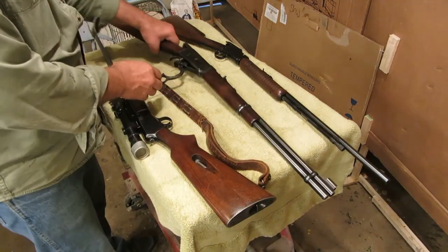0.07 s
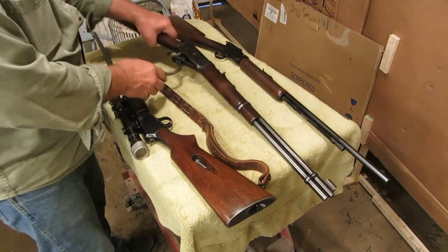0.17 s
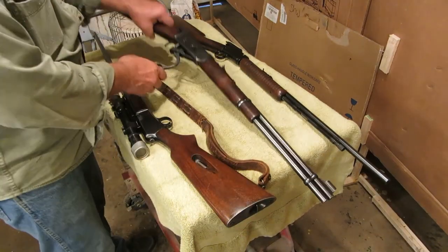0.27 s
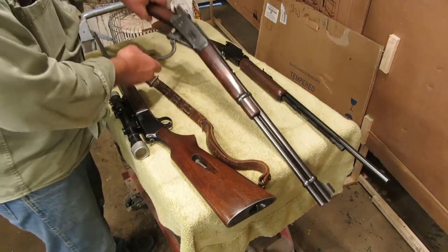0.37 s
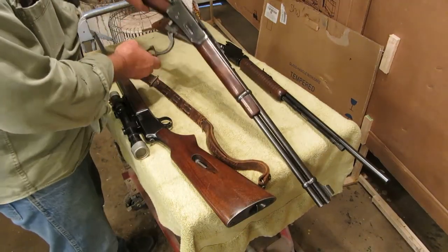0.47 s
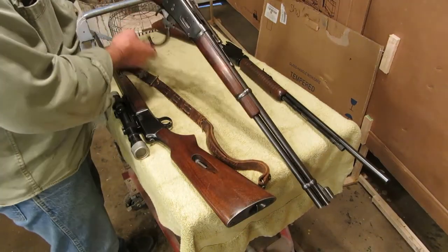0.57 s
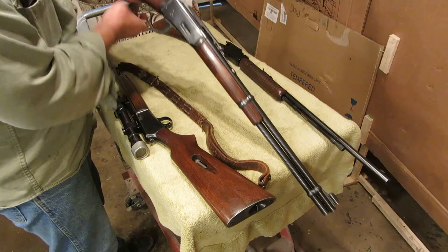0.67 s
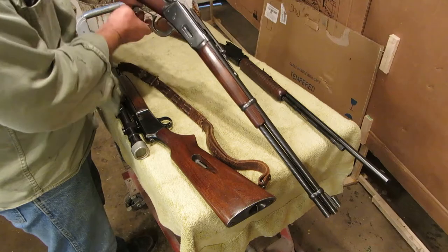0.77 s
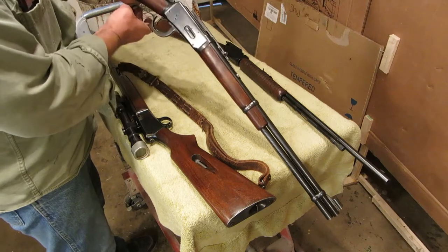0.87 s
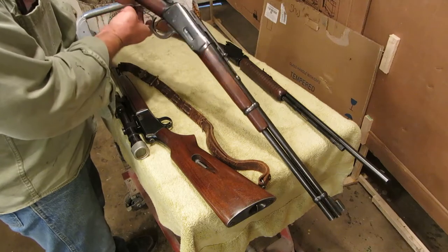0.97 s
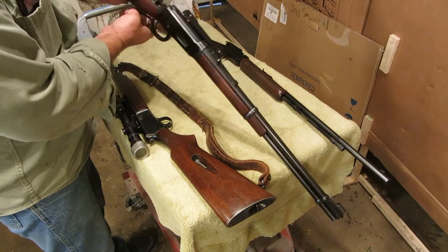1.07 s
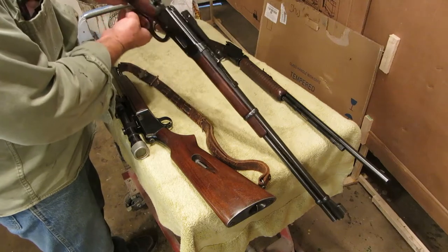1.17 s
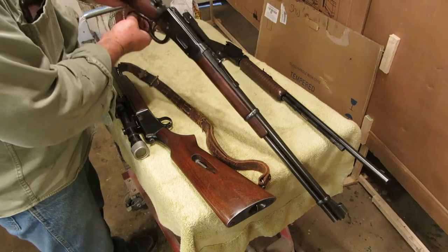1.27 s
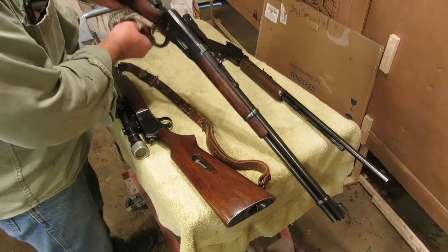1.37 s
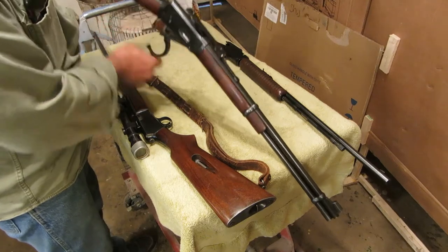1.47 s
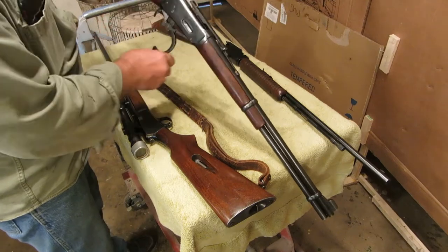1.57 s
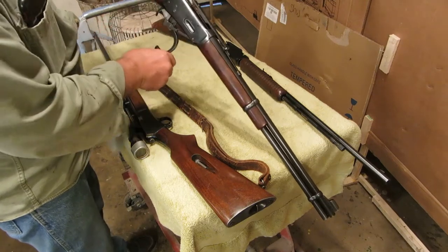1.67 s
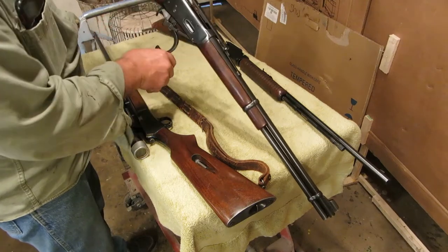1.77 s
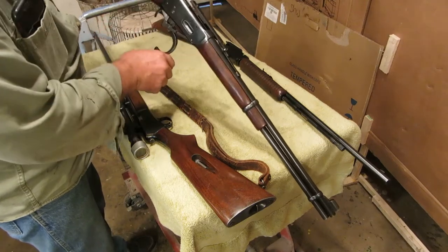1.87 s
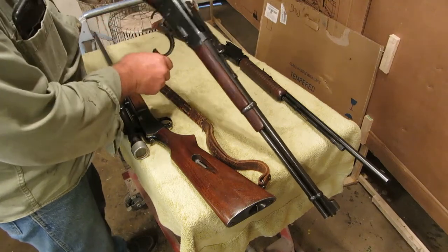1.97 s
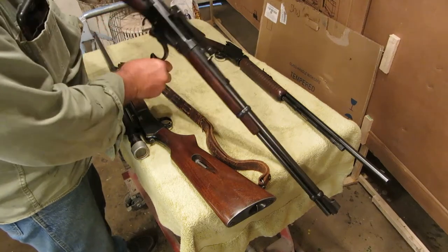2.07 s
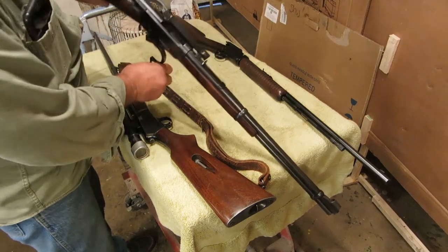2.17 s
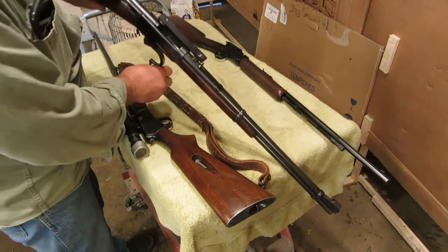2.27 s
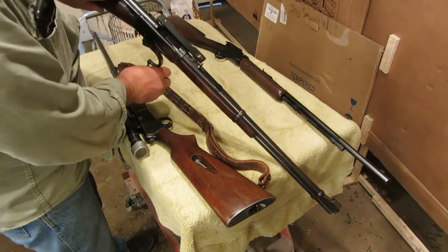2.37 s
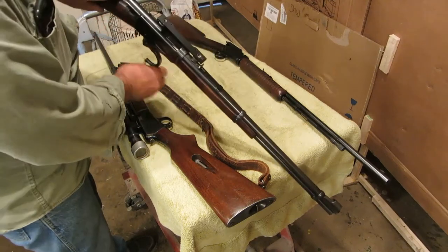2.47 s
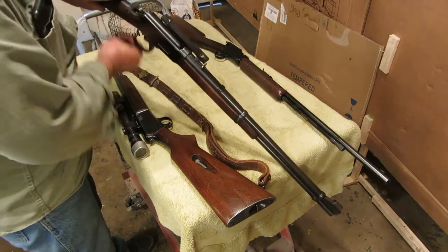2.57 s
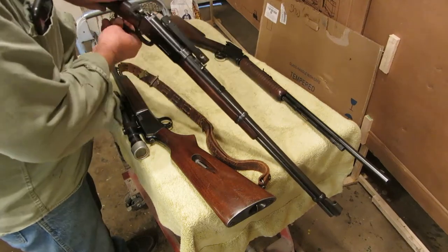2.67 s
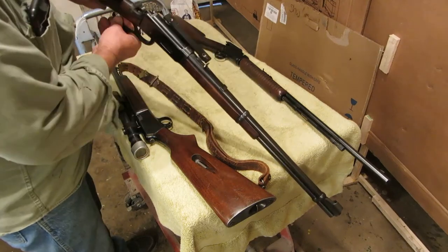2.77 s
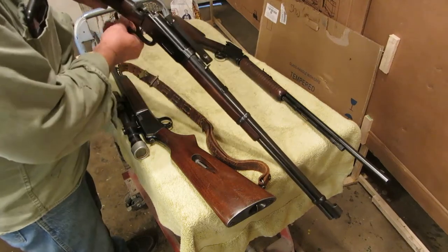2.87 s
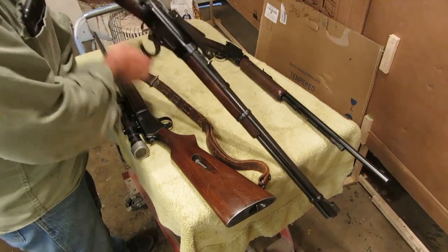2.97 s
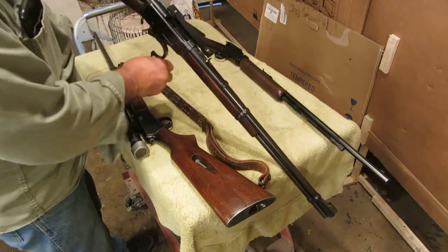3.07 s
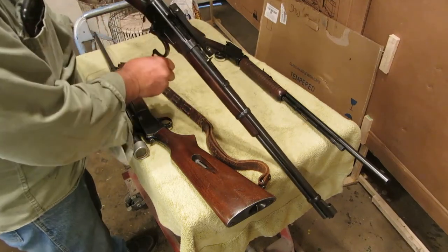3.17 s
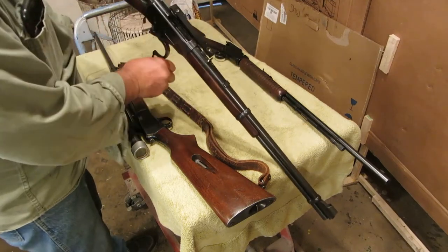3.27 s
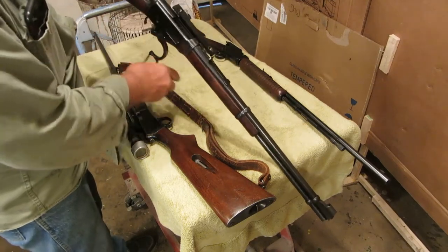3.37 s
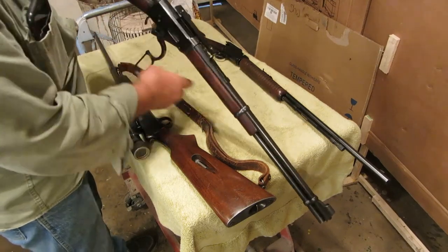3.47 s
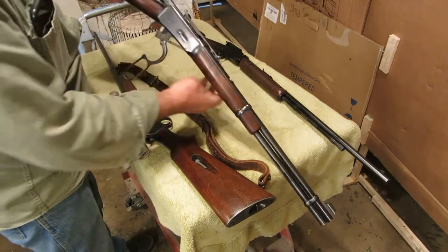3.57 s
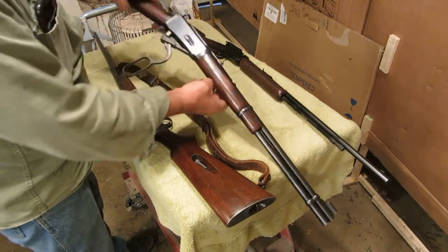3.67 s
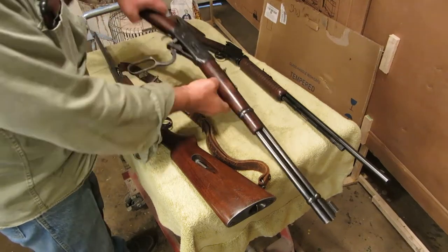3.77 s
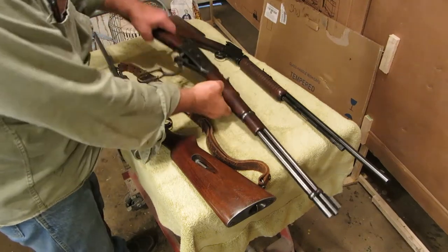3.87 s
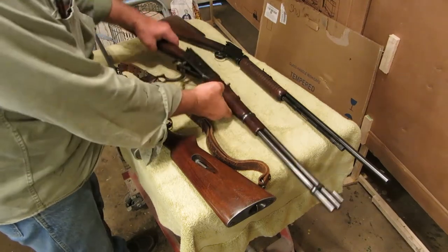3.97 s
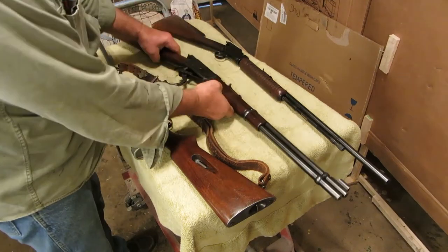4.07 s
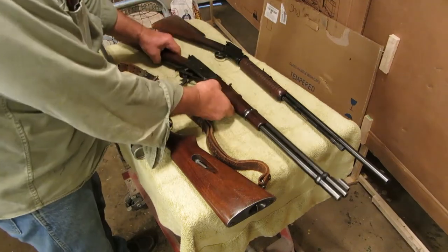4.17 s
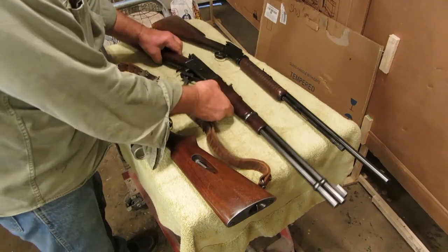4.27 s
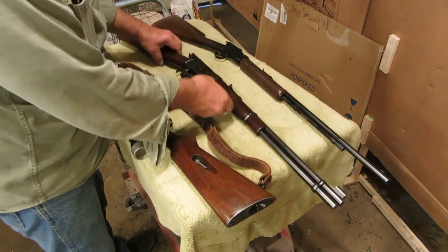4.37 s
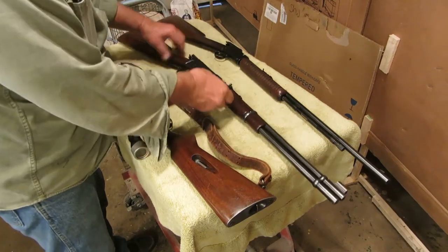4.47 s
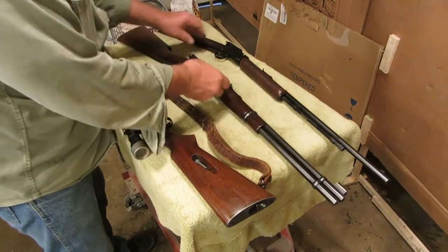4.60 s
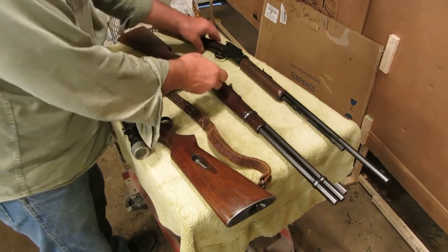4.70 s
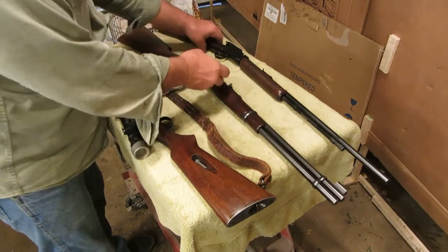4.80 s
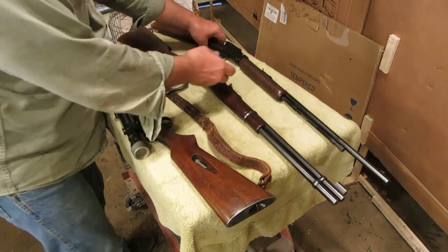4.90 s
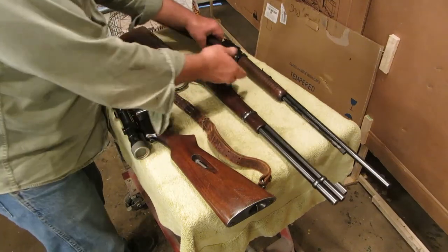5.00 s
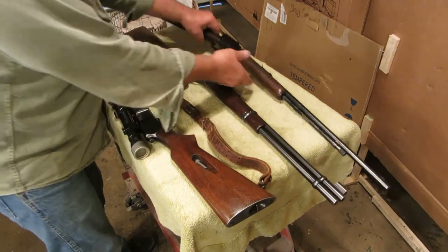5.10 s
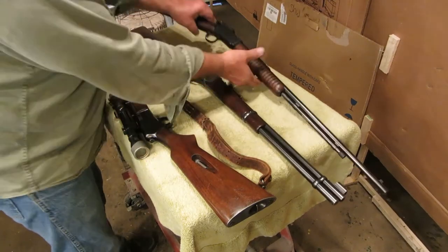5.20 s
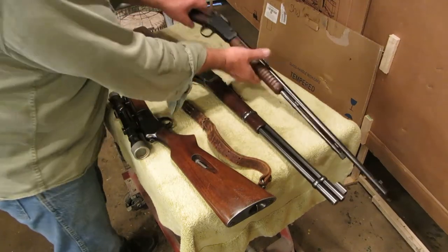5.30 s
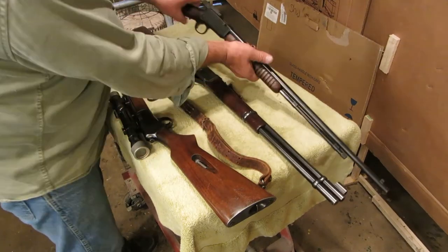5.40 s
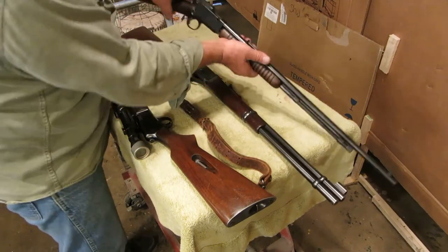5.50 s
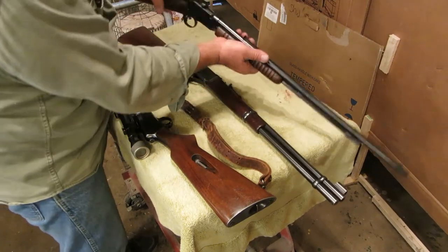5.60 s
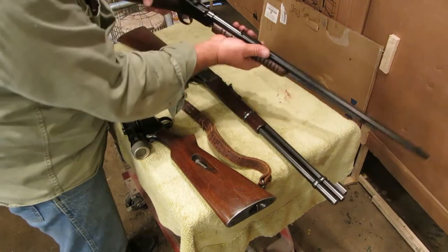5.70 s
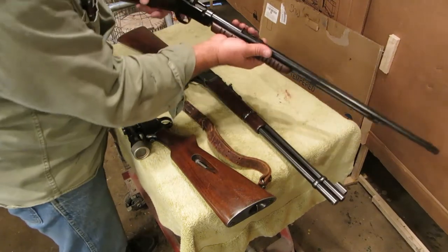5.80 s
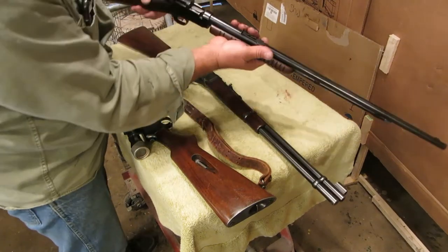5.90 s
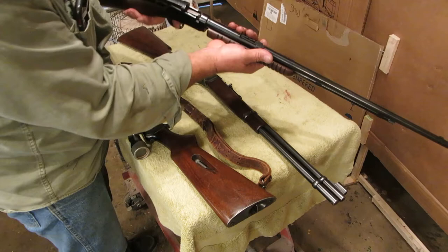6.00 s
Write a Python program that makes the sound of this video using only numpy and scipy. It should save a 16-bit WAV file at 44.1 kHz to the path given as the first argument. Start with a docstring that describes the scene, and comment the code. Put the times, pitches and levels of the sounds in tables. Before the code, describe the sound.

A small workshop, heard closely in stereo, with soft airy hiss and a very faint high whine. From 0 s, light sliding and cloth rub, a wooden knock at 0.2, small steel ticks at 0.35-0.45. At 0.62-0.71 the rifle action opens in a rapid loud clatter with a brief hollow tone dropping in pitch. The background ducks. At 1.43-1.63 scrapes and clicks lead to two very hard snaps, at 1.49 and 1.63. Sleeves rustle near 2.2; a second opening clatters at 2.51-2.66, then ticks and slams at 2.93-3.08, the last hardest. Small clicks follow at 3.31-3.46, the final one with a thin ring. Each clack rings for under half a second. The hiss slowly swells back. A dull wood knock lands around 4.17-4.27, faint drags at 4.6, knocks and sleeve rub around 5.0-5.1, a tiny tick at 5.5, then quiet rustle and air.

```python
"""A lever-action rifle is cycled by hand over a cloth-covered table in a small workshop.
Lever, bolt and hammer clack as coloured noise bursts plus decaying steel modes; the room rings after each.
Then the rifle is laid down and another lifted: soft knocks and drags of wood (noise and damped modes).
Slides and sleeves are grainy noise over steady air and a faint whine.
A gain control ducks at loud slams, and the background slowly swells back."""
import sys
import numpy as np
from scipy import signal
from scipy.fft import rfft, irfft
from scipy.io import wavfile
from scipy.ndimage import uniform_filter1d, minimum_filter1d

SR = 44100
rng = np.random.default_rng(int(sys.argv[2]) if len(sys.argv) > 2 else 0)


def to_wav(s):
    """Save 16-bit WAV."""
    ch = np.atleast_2d(s).T  # columns
    pcm = np.round(np.clip(ch, -1, 1) * 32767)  # PCM
    wavfile.write(sys.argv[1], SR, pcm.astype(np.int16))


N = 266540
TIME = np.arange(N) / SR
HZ = np.fft.rfftfreq(N, 1 / SR)


def amp(db):
    """Decibels to gain."""
    return 10 ** (np.asarray(db) / 20)


def unit(x):
    """Scales to rms 1."""
    return x / np.sqrt(np.mean(x ** 2) + 1e-20)


def read(points, hz):
    """Reads a table along a log-frequency axis."""
    f, value = np.transpose(points)
    return np.interp(np.log(hz + 1), np.log(f + 1), value)


def add(mix, s, sound):
    """Mixes a sound in at a time [s]."""
    part = mix[max(round(s * SR), 0):][:len(sound)]
    part += sound[:len(part)]


def colour(x, points):
    """Gives a full-length sound a spectrum."""
    return irfft(rfft(x) * amp(read(points, HZ)), N)


def strokes(rows, attack_s, t60):
    """Gain curve: each movement rises from its start and dies away once its length is over."""
    total = 0
    for s, length, db in rows:
        rise = np.clip((TIME - s) / attack_s, 0, 1)
        past_end = np.maximum(TIME - s - length, 0)
        total = total + amp(db - 60 * past_end / t60) * rise
    return total


def friction(points, catches_per_s, spread_db, smooth):
    """Tiny catches of uneven size over a smooth rub."""
    size = amp(spread_db * np.minimum(rng.exponential(1, N), 4))
    happens = rng.random(N) < catches_per_s / SR
    catches = size * rng.choice([-1, 1], N) * happens
    rub = smooth * rng.standard_normal(N)
    return unit(colour(unit(catches) + rub, points))


# diffuse field at two close ports: (frequency [Hz], left-right correlation)
PORT_CORRELATION = [(40, -0.1), (250, -0.61), (550, -0.39), (1100, 0.14), (2500, 0.41), (6000, 0.56),
                    (14000, 1)]


def ports(pair):
    """Two unrelated signals become what two close microphone ports hear of a diffuse field."""
    size = pair.shape[1]
    same = np.clip(read(PORT_CORRELATION, np.fft.rfftfreq(size, 1 / SR)), -.99, .99)
    mid, side = rfft(pair) * np.sqrt([(1 + same) / 2, (1 - same) / 2])
    return irfft(np.array([mid + side, mid - side]), size)


# spectrum of the workshop air: (frequency [Hz], gain [dB])
AIR_COLOUR = [(25, -11), (60, 0.5), (130, -8.5), (250, -6), (470, -8), (720, -0.5), (1100, -7.5),
              (2500, -9), (4000, -16), (7500, -19.5), (12000, -25.5), (16000, -31)]
BACKGROUND_DB = -45
WHINE_HZ, WHINE_DB_RE_AIR = 15730, -23  # sine peak re air rms


def workshop_air():
    """Steady diffuse noise with a faint electrical whine."""
    air = unit(ports(colour(rng.standard_normal((2, N)), AIR_COLOUR)))
    whine = amp(WHINE_DB_RE_AIR) * np.sin(2 * np.pi * WHINE_HZ * TIME)
    return amp(BACKGROUND_DB) * (air + whine)


# spectrum of rubbing cloth: (frequency [Hz], gain [dB])
SLEEVE_COLOUR = [(40, -6.5), (80, 1), (160, -5), (370, 0.5), (500, -3.5), (750, -4), (1300, 1), (2700, -6),
                 (4500, -10), (8000, -15.5), (12000, -27), (16000, -33.5)]
# arm movements that rub sleeves and palms: (start [s], length [s], level [dB])
REACHES = [(0, 0.14, -52.5), (1.22, 0.16, -41.5), (2.2, 0.34, -44), (4.02, 0.26, -50), (4.53, 0.098, -52),
           (4.96, 0.096, -39.5), (5.68, 0.18, -49.5)]
REACH_ATTACK_S, REACH_T60_S, SLEEVE_REST_DB = 0.097, 0.34, -49.5


def sleeves():
    """Cloth rubs as grainy noise that swells with each reach and is never quite still."""
    rubbing = np.hypot(amp(SLEEVE_REST_DB), strokes(REACHES, REACH_ATTACK_S, REACH_T60_S))
    pair = [friction(SLEEVE_COLOUR, catches_per_s=1500, spread_db=1.5, smooth=2.3) for _ in range(2)]
    return rubbing * ports(np.array(pair))


def blow(points, tilt_db_per_oct, t60, after_db, after_t60, size=8192):
    """Countless short modes: a burst that dies fast, a weaker after-ring, and a causal colour."""
    t, hz = np.arange(size) / SR, np.fft.rfftfreq(size, 1 / SR)
    fade = amp(-60 * t / t60) + amp(after_db - 60 * t / after_t60)
    burst = rfft(rng.standard_normal(size) * fade)
    burst /= np.sqrt(uniform_filter1d(abs(burst) ** 2, size=300))  # even over wide bands, ragged within
    tilt_db = tilt_db_per_oct * np.log2(np.maximum(hz, 500) / 4000)
    log_gain = np.log(amp(read(points, hz) + tilt_db))
    mirrored = np.r_[log_gain, log_gain[-2:0:-1]]
    causal = np.exp(signal.hilbert(mirrored).conj())[:len(hz)]  # minimum phase
    release = np.minimum(1, 2 * (1 - t / t[-1])) ** 2
    return unit(irfft(burst * causal, size) * release) * np.sqrt(np.mean(fade ** 2))


HELD_T60_S = .36  # the hands damp anything longer


def ring(modes, spread_db, detune):
    """Long modes of a body; each impact point favours others, and moving parts shift them a little."""
    hz, db, t60 = np.transpose(modes)[:, :, None]
    t60 = np.minimum(t60, HELD_T60_S)
    t = np.arange(SR // 2) / SR
    weight_db = db + spread_db * rng.standard_normal(hz.shape)
    hz = hz * (1 + detune * rng.standard_normal(hz.shape))
    swell = 1 - np.exp(-t / 0.0014)  # the blow takes a moment to spread through the body
    tones = np.sin(2 * np.pi * (hz * t + rng.random(hz.shape)))
    return swell * (amp(weight_db - 60 * t / t60) * tones).sum(0)


# wooden stock meeting table and hands: (time [s], level [dB], t60 [s])
KNOCKS = [(.195, -34, 0.19), (4.168, -44, 0.17), (4.265, -30, 0.077), (4.655, -45.5, .12),
          (4.98, -34, 0.034), (5.078, -33, .034), (5.088, -32.5, 0.066)]
KNOCK_TILT_DB_PER_OCT, KNOCK_RING_DB = 2, -17.5
# spectrum of a knock: (frequency [Hz], gain [dB])
THUD_COLOUR = [(40, -27), (200, -14), (500, -10), (900, 13.5), (1600, 2), (3000, 7), (5000, -6.5),
               (8000, -13.5), (16000, -31.5)]
# modes of the stock and its fittings: (frequency [Hz], level [dB], t60 before hand damping [s])
STOCK_MODES = [(166, -14.5, 0.05), (260, -9, .1), (370.5, -3, 0.18), (602, 3.5, 0.024), (882, -8, 0.15),
               (950, -5, 0.088), (1341, -6, 0.058), (1606, -2.5, 0.25), (1955, -4.5, 0.29),
               (2180, -7, 0.082), (2500, -9.5, .3), (2970, -8.5, .06), (3550, -13.5, 0.076)]
# stock dragged over the cloth: (start [s], length [s], level [dB])
DRAGS = [(-.03, 0.071, -40.5), (.18, 0.022, -39.5), (4.25, 0.034, -43), (4.585, 0.079, -45.5),
         (5.02, .06, -53.5)]
DRAG_ATTACK_S, DRAG_T60_S = 0.018, .3


def stock():
    """Dull knocks, cushioned by cloth and hands, and the drag of the wood, which sounds the same modes."""
    out = np.zeros(N)
    for s, db, t60 in KNOCKS:
        sound = amp(KNOCK_RING_DB) * ring(STOCK_MODES, spread_db=6.5, detune=.006)
        add(sound, 0, blow(THUD_COLOUR, KNOCK_TILT_DB_PER_OCT, t60, after_db=-10, after_t60=.12))
        cushion = 1 - np.exp(-TIME[:len(sound)] / 0.002)
        add(out, s, amp(db) * sound * cushion)
    grip = np.exp(-TIME[:SR // 2] / 0.004)  # damps the wood
    held = ring(STOCK_MODES, spread_db=-0.5, detune=0.013) * grip
    drag = unit(signal.fftconvolve(rng.standard_normal(N), held)[:N])
    return out + strokes(DRAGS, DRAG_ATTACK_S, DRAG_T60_S) * drag


# parts sliding under the hand: (start [s], length [s], level [dB])
SLIDES = [(-.02, 0.033, -32), (.06, .1, -40), (.16, 0.08, -39.5), (1.418, .06, -31.5), (1.57, 0.068, -26),
          (2.52, 0.011, -23), (2.575, 0.11, -23.5), (2.93, .03, -33.5), (2.975, .07, -24.5),
          (3.43, 0.028, -30), (5.035, .035, -46.5)]
SLIDE_ATTACK_S, SLIDE_T60_S = .015, 0.21
# spectrum of the scrape: (frequency [Hz], gain [dB])
SCRAPE_COLOUR = [(40, -22.5), (200, -24), (370, -10), (500, -10), (870, 2), (1200, -2.5), (2200, 2.5),
                 (3200, -1.5), (5000, -6), (7500, -8.5), (11000, -19.5), (16000, -30)]
# spectrum of struck steel, for ticks and clacks: (frequency [Hz], gain [dB])
CRACK_COLOUR = [(40, -40), (200, -40), (430, -32), (750, -13), (1100, -11.5), (2100, 0), (4000, -1),
                (7000, 2), (10000, -3.5), (13500, -7.5), (16000, -24)]
RATTLE_DB_RE_SCRAPE, RATTLES_PER_S = -14, 200


def slides():
    """Parts scrape along each other, and loose ones tick as they go."""
    scrape = friction(SCRAPE_COLOUR, catches_per_s=3000, spread_db=2, smooth=1.5)
    rattle = friction(CRACK_COLOUR, RATTLES_PER_S, spread_db=2, smooth=0)
    return strokes(SLIDES, SLIDE_ATTACK_S, SLIDE_T60_S) * (scrape + amp(RATTLE_DB_RE_SCRAPE) * rattle)


# hollow ring in the receiver as the bolt opens: (start [s], length [s], level [dB])
CAVITY = [(.638, .064, -20.5)]
CAVITY_ATTACK_S, CAVITY_T60_S = 0.0066, 0.081
CAVITY_SHUT_HZ, CAVITY_OPEN_HZ, BOLT_TRAVEL_S = 2627, 1594, .025


def cavity(width_hz):
    """A hollow resonance, its phase wandering at random, glides down as the action opens."""
    opened = np.clip((TIME - CAVITY[0][0]) / BOLT_TRAVEL_S, 0, 1)
    hz = CAVITY_SHUT_HZ + (CAVITY_OPEN_HZ - CAVITY_SHUT_HZ) * opened
    jitter = uniform_filter1d(rng.standard_normal(N), size=130)
    wander = np.cumsum(jitter) * np.sqrt(2 * np.pi * width_hz / SR)
    tone = np.sqrt(2) * np.sin(2 * np.pi * np.cumsum(hz) / SR + wander)
    return strokes(CAVITY, CAVITY_ATTACK_S, CAVITY_T60_S) * tone


# steel striking steel: (time [s], level [dB], brightness [dB per octave], t60 of the crack [s])
CLACKS = [(0.3387, -38.5, -10, .037), (0.3959, -27, -9, 0.071), (0.4193, -22.5, -3, 0.047),
          (.452, -31, -6.5, .07), (0.6156, -34, -7.5, .024), (.6379, -20.5, -6.5, 0.02),
          (.6441, -15, -0.5, 0.024), (.652, -1, -2, .032), (.673, -2.5, -4, .03),
          (0.6577, -9.5, -3.5, .025), (.6966, -0.5, 2, 0.027), (0.7039, -0.5, 2.5, 0.043),
          (0.7101, 3, -2, 0.035), (1.4295, -13, 0.5, 0.016), (1.443, -13, -3, 0.013),
          (1.446, -14, -4, 0.013), (1.4808, -9.5, -4.5, .022), (1.4857, 8.5, -.5, 0.019),
          (1.5203, 0.5, -3.5, 0.031), (1.6164, -1, -3.5, .028), (1.6331, 14, 0.5, 0.017),
          (2.245, -39, -10.5, 0.063), (2.5144, -25.5, -4, 0.028), (2.524, -17, 2, 0.017),
          (2.5295, -12.5, -2.5, 0.022), (2.588, -10, -1.5, 0.035), (2.612, -11, -2.5, .036),
          (2.6478, -2, -2, 0.0291), (2.6551, 1, 0, 0.036), (2.9261, -20.5, -6, 0.034),
          (2.9406, -16, 3.5, 0.011), (2.9554, -16.5, 1.5, 0.026), (2.97, -14.5, -3.5, 0.038),
          (3.0017, 7, -0.5, 0.038), (3.029, 6.5, -2, 0.012), (3.07, -3.5, -3, 0.05),
          (3.08, 15.5, 1, 0.0096), (3.3114, -23.5, -4, 0.011), (3.3474, -19.5, -1.5, 0.0086),
          (3.432, -20, -6.5, .03), (3.464, -12.5, -2, 0.076), (4.5338, -34.5, -10, 0.032),
          (5.5061, -32, -6, .014)]
# modes of receiver, lever and barrel: (frequency [Hz], level [dB], t60 before hand damping [s])
STEEL_MODES = [(800, 0, .09), (1002, -0.5, 0.21), (1297, 4, .2), (1545, -1, 0.37), (1601, 5, 0.3),
               (1724, 1.5, 0.22), (1898, -8.5, 0.15), (2155, 7.5, 0.25), (2225, 2, .25),
               (2360, -14.5, 0.16), (2517, -0.5, 0.34), (2850, 3, 0.35), (3030, 2.5, 0.3),
               (3270, 4.5, 0.24), (3890, -4.5, 0.25), (4500, 1, 0.25), (4360, -5, .7), (4920, -4, .3),
               (4950, -4.5, .3), (6131, -1.5, 0.19), (6580, -10, .3), (7387, -8, 0.3), (7560, -8, .3),
               (8320, 2, 0.46), (8333, -10, 0.22), (9100, -16, .3), (11260, -11, .25)]
# short or longer pure tones beside clacks and knocks: (time [s], frequency [Hz], level [dB], t60 [s])
PURE_TONES = [(.4193, 8130, -45, .25), (.4193, 8420, -45, .2), (.6966, 1618, -17, .3),
              (2.656, 1670, -18, .3), (3.464, 7040, -32, .4), (3.464, 4393, -37, .4), (5.08, 840, -38, .22),
              (5.094, 2353, -39, .3), (5.093, 3050, -33, .05), (5.5065, 4100, -25.5, .007)]
RING_DB, RING_T60_S = -38.5, 0.014  # ring gain at this crack t60; looser parts crack longer, ring more
SENT_DB, STEEL_SENT_DB = -2, -19  # shares of crack and ring that go into the room


def action():
    """Clacks crack and set the steel ringing, beside pure tones; returns direct sound and room feed."""
    near, sent = np.zeros((2, N))
    for s, db, tilt, t60 in CLACKS:
        crack = blow(CRACK_COLOUR, tilt, t60, after_db=-31.5, after_t60=0.025)
        ring_gain = amp(db + RING_DB) * t60 / RING_T60_S
        steel = ring_gain * ring(STEEL_MODES, spread_db=3.0, detune=.003)
        add(near, s, amp(db) * crack)
        add(near, s, steel)
        # the room gathers what leaves in all directions, so the notches of the crack even out
        spread = unit(blow(CRACK_COLOUR, tilt, t60=0.0018, after_db=-59, after_t60=.01))
        add(sent, s, amp(db + SENT_DB) * spread * np.std(crack))
        add(sent, s, amp(STEEL_SENT_DB) * steel)
    t = TIME[:SR // 2]
    for s, hz, db, t60 in PURE_TONES:
        add(near, s, amp(db - 60 * t / t60) * np.sin(2 * np.pi * hz * t))
    return near, sent


# table, a sleeve and the nearest wall: (delay [s], level [dB])
ECHOES = [(.0048, -12.5), (.0095, -30), (0.0144, -22.5)]
# difference between the ports for near sound: (frequency [Hz], side re mid [dB])
GLANCE = [(100, -8), (500, -13.5), (1200, -24.5), (2200, -32), (4500, -14), (8000, -18), (14000, -12)]


def direct(x):
    """Near sound and first echoes; a phase-shifted side signal makes the two ports differ slightly."""
    mid = x.copy()
    for delay, db in ECHOES:
        add(mid, delay, amp(db) * x)
    side = colour(signal.hilbert(mid).imag, GLANCE)
    return np.array([mid + side, mid - side])


# decay of the workshop: (frequency [Hz], t60 [s])
ROOM_T60 = [(200, 0.099), (660, 0.55), (1740, 0.48), (4590, 0.43), (8000, 0.36), (14000, 0.29)]


def room(x, wet_db):
    """Close walls return a dense tail, each band dying at its own speed."""
    hz, t, z = signal.stft(rng.standard_normal((2, SR)), SR, nperseg=256)
    decay = amp(-60 * t / read(ROOM_T60, hz)[:, None])
    tail = signal.istft(z * decay, SR, nperseg=256)[1]
    onset = np.clip((TIME[:tail.shape[1]] - .004) / .007, 0, 1)
    tail = ports(tail * onset)
    return amp(wet_db) * signal.fftconvolve(x[None], tail / np.linalg.norm(tail[0]), axes=1)[:, :N]


def moving_room(x, wet_db, count=3):
    """The rifle moves about, so the pattern of the tail keeps changing: crossfaded tails."""
    turn = np.pi * (TIME / 1.3 + np.arange(count)[:, None] / count)
    shares = np.cos(turn) * np.sqrt(2 / count)
    return sum(room(x * share, wet_db) for share in shares)


def scene():
    """Action, handling and background together in the workshop."""
    near, sent = action()
    handling = stock() + slides() + cavity(width_hz=142.4)
    rifle = direct(near + handling) + moving_room(sent + handling, wet_db=-5.0)
    balance = amp([[-.3], [.3]])  # left, right
    return rifle * balance + sleeves() + workshop_air()


DUCK_ABOVE_DB, DUCK_WINDOW_S, DUCK_LAG_S = -15, 0.012, 0.0037
RECOVER_S = 1.34  # time constant of the cut in dB


def duck(x):
    """Gain control: turns down quickly, a little late, when power is too high, and recovers slowly."""
    power = uniform_filter1d((x ** 2).mean(0), size=round(DUCK_WINDOW_S * SR))
    over_db = np.maximum(10 * np.log10(abs(power) + 1e-12) - DUCK_ABOVE_DB, 0)
    recovery = np.exp(-TIME / RECOVER_S)
    cut_db = np.maximum.accumulate(over_db / recovery) * recovery
    return x * amp(-np.interp(TIME - DUCK_LAG_S, TIME, cut_db))


EDGE_HZ = 16300


def record(dry):
    """After the gain control a fast limiter holds the hardest clacks at full scale; then the band limit."""
    ducked = duck(dry)
    allowed = 1 / np.maximum(abs(ducked).max(0), 1)
    limited = ducked * uniform_filter1d(minimum_filter1d(allowed, size=45), size=45)
    lowpass = signal.firwin(301, EDGE_HZ, window=("kaiser", 8), fs=SR)
    return signal.oaconvolve(limited, lowpass[None], "same")


dry = scene()
out = record(dry)
to_wav(out)
```